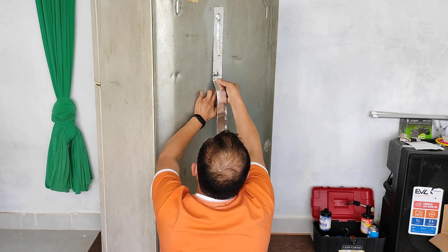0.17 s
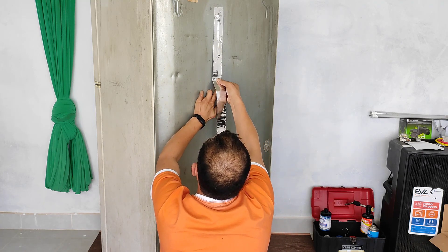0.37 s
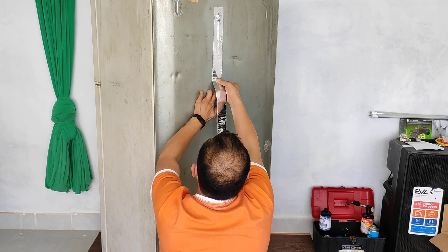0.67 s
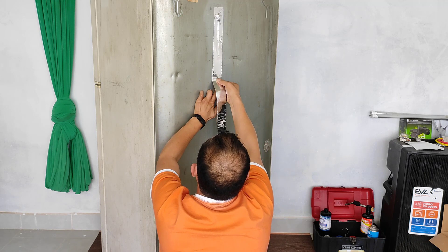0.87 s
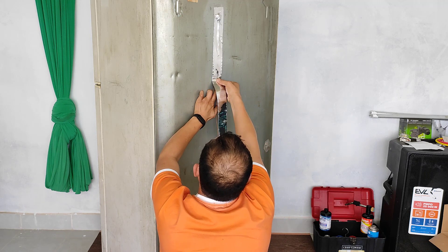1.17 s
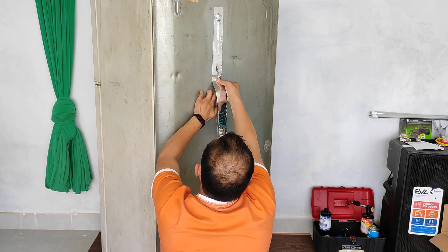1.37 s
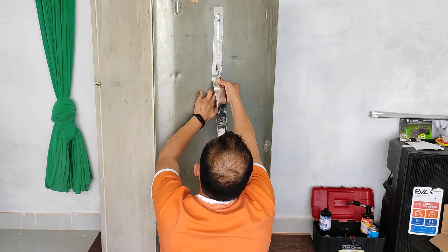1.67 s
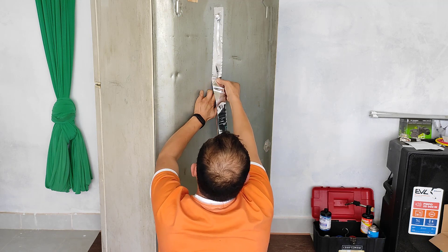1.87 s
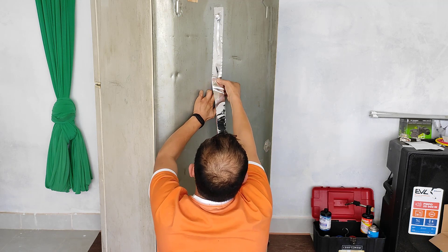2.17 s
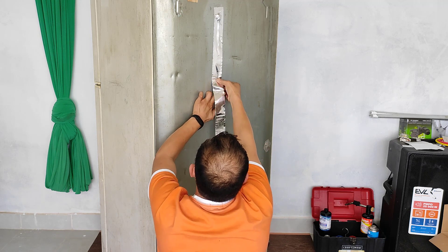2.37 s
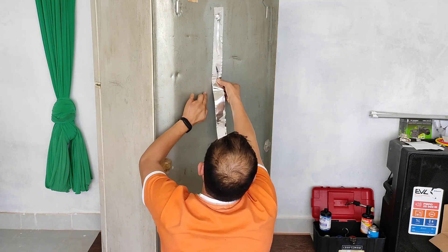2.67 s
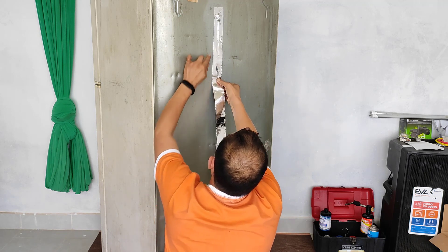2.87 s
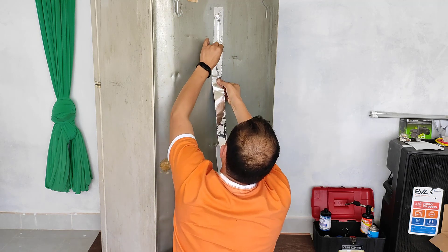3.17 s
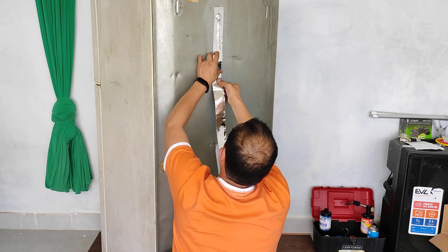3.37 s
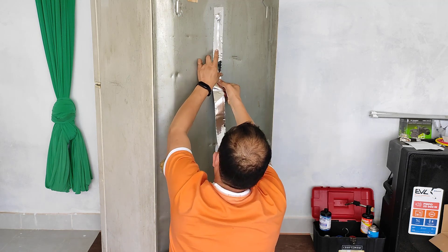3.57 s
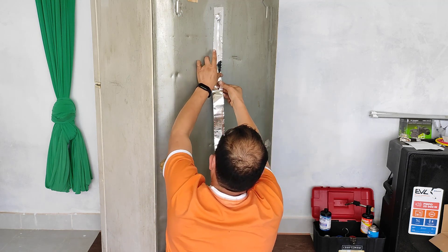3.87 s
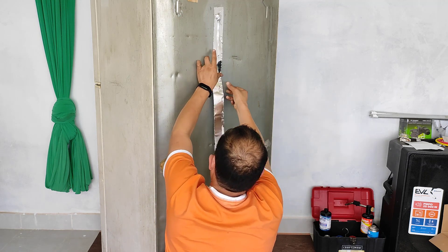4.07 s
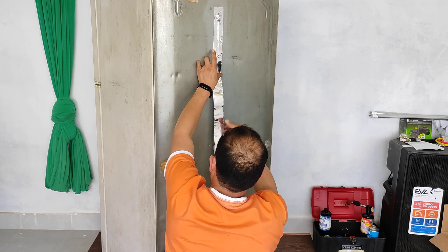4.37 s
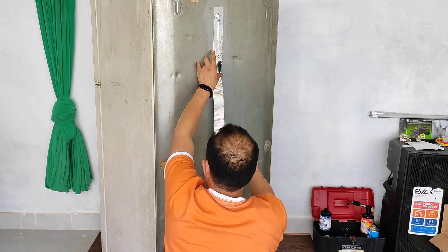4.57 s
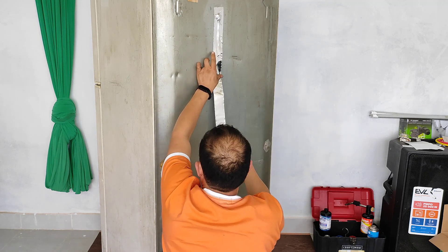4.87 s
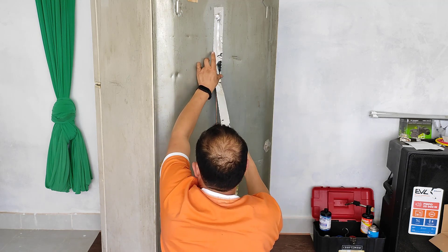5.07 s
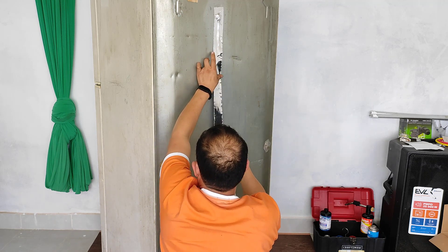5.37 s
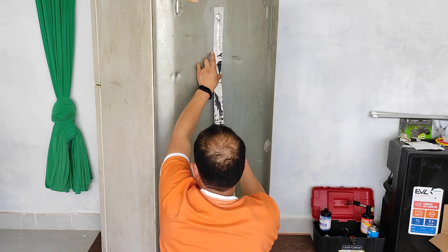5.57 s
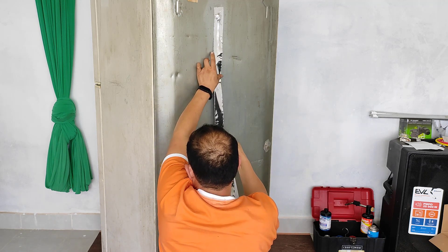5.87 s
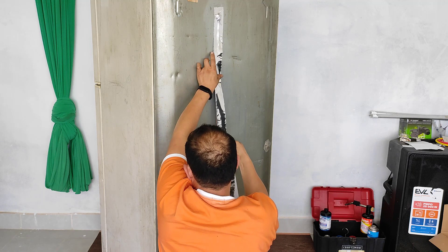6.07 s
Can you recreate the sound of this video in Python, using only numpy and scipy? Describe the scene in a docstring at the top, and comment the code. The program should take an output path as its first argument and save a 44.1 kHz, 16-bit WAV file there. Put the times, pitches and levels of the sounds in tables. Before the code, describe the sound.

Stiff foil tape snaps and crackles sharply under a hand against a sheet-metal panel, with a low thud, in a bare echoing room.

```python
"""Stiff foil tape snaps and creases under a hand on a tall sheet-metal panel, in a bare, hard room.
Snaps are wide clicks with a short ring at the crease's pitch, creasing is a spray of tiny filtered clicks,
and both pass through a synthetic room. Blows make the panel boom as a sum of decaying modes.
A low beating hum (two sines), faint gliding drones and slow air pressure lie under quiet room noise."""
import sys
import numpy as np
from scipy import signal
from scipy.fft import rfft, irfft
from scipy.io import wavfile

SR = 44100
rng = np.random.default_rng(int(sys.argv[2]) if len(sys.argv) > 2 else 0)


def dump(signal):
    """Clip the signal to [-1, 1] and save it as 16-bit WAV at the path in sys.argv[1]."""
    limited = np.clip(np.atleast_2d(signal).T, -1, 1)
    pcm = np.round(limited * 32767).astype(np.int16)
    wavfile.write(sys.argv[1], SR, pcm)


def decibels_to_gain(level_db):
    """Convert a level in decibels to a linear amplitude gain (20 dB per decade)."""
    exponent = np.asarray(level_db, float) / 20
    return 10 ** exponent


N = 274302  # samples

SHADE_FROM_S = 4.4  # from here the hand works lower down and the worker's back shades the snaps


def evened(x):
    """Scales to unit rms."""
    return x / np.sqrt(np.mean(x ** 2) + 1e-20)


def read(points, hz):
    """Interpolates (hz, value) points along log frequency."""
    point_hz, value = np.transpose(points)
    return np.interp(np.log(hz + 1), np.log(point_hz + 1), value)


def curve(rows):
    """Interpolates each column of (time_s, ...) rows over the scene."""
    time_s, *columns = np.transpose(rows)
    return [np.interp(np.arange(N) / SR, time_s, column) for column in columns]


def add(mix, start_s, sound):
    """Adds a sound in place, cut at the end of the mix."""
    part = mix[round(start_s * SR):][:len(sound)]
    part += sound[:len(part)]


def band(x, lo_hz, hi_hz, order=2):
    """Butterworth bandpass."""
    sos = signal.butter(order, [lo_hz, hi_hz], "bandpass", fs=SR, output="sos")
    return signal.sosfilt(sos, x)


def diffuse(size, shape, window=512):
    """Unit-rms noise at two microphones, alike by pitch; shape(hz, s) is its relative level in dB."""
    # left-right likeness: pitch_hz, likeness (0 to 1)
    likeness_points = [(40, 0.15), (70, 0.54), (130, 0.94), (290, 0.91), (640, 0.32), (1400, 0.082),
                       (3000, 0.051), (15000, 0.06)]
    frames = 4 * size // window + 5
    hz = np.fft.rfftfreq(window, 1 / SR)[:, None]
    time_s = np.arange(frames) * window / 4 / SR
    a, b, c, d = rng.standard_normal((frames, len(hz), 4)).T
    likeness = np.clip(read(likeness_points, hz), -1, 1)
    left = a + 1j * b
    right = likeness * left + np.sqrt(1 - likeness ** 2) * (c + 1j * d)
    spectra = np.array([left, right]) * decibels_to_gain(shape(hz, time_s))
    noise = signal.istft(spectra, nperseg=window, noverlap=3 * window // 4)[1]
    return evened(noise[:, :size])


def background():
    """Coloured room noise, plus slow pressure drift independent at each microphone."""
    # room noise spectrum: pitch_hz, relative_level_db
    air_colour = [(30, -10), (40, -12), (55, -12), (120, -14), (180, -13.5), (269, -9.5), (330, -21.5),
                  (514, -20), (785, -32), (850, -18), (950, -25.5), (2070, -42), (3200, -34), (8350, -40.5),
                  (10000, -43.5), (13600, -35.5), (15000, -58)]
    air = decibels_to_gain(-62.5) * diffuse(N, lambda hz, s: read(air_colour, hz), window=2048)
    drift = band(rng.standard_normal((2, N)), 1.14, 6.8, order=1)
    return air + decibels_to_gain(-50.5) * evened(drift)


def hum():
    """A steady low line and a second just below it, which work against each other once in every beat."""
    # time_s, upper_rms_db, beat_rate_hz, lower_rms_db
    hum_rows = [(0, -62, 4.7, -63), (1.0, -64, 4.1, -56.5), (1.6, -62.5, 3.06, -54.5),
                (2.0, -57.5, 2, -61.5), (2.6, -61, 1.14, -59), (2.87, -48.5, 1.12, -54),
                (3.02, -55, 1.27, -57), (3.25, -54, 2.2, -53), (3.67, -46.5, 1.13, -84.5),
                (4.05, -50, 0.85, -74), (4.25, -59.5, 0.97, -61.5), (4.6, -52.5, 1.38, -70),
                (4.85, -62.5, 1.6, -71), (5.5, -57.5, 0.7, -85), (5.65, -64, 1.3, -70), (5.8, -63, 1, -73),
                (6.22, -61, 1.1, -75)]
    upper_hz, first_cancel_s = 70.8, 0.22
    upper_db, beats_hz, lower_db = curve(hum_rows)
    turns = upper_hz * np.arange(N) / SR + rng.random()
    beats = np.cumsum(beats_hz) / SR
    beats -= beats[round(first_cancel_s * SR)]
    upper = decibels_to_gain(upper_db) * np.sin(2 * np.pi * turns)
    lower = decibels_to_gain(lower_db) * np.sin(2 * np.pi * (turns - beats))
    return np.sqrt(2) * (upper - lower)


def drones():
    """Faint low tones; each glides evenly under one arch of level."""
    # start_s, length_s, first_hz, last_hz, top_rms_db
    drone_rows = [(0.399, 2.9, 96.3, 118.1, -66.5), (2.5, 0.98, 100.6, 102.6, -62.5),
                  (3.449, 0.71, 100.1, 100.7, -58.5)]
    out = np.zeros(N)
    for start_s, length_s, first_hz, last_hz, top_db in drone_rows:
        progress = np.arange(0, length_s, 1 / SR) / length_s
        turns = np.cumsum(first_hz + (last_hz - first_hz) * progress) / SR + rng.random()
        arch = np.sin(np.pi * progress) ** 0.57
        add(out, start_s, np.sqrt(2) * decibels_to_gain(top_db) * arch * np.sin(2 * np.pi * turns))
    return out


def boom():
    """The sheet swings in modes near each blow's favoured pitch; they take a cycle or two to build."""
    # modes: pitch_hz, relative_level_db, t60_s
    panel_modes = [(36.85, 0.5, 1.24), (71, -12.5, 1.2), (124.7, -4.5, 0.92), (145.8, -11, 0.74),
                   (178.4, 0.5, 0.47), (212, -4, 0.33), (232.4, -9.5, 0.63), (254, -4, 0.39),
                   (302.3, -6, 0.2), (401.7, -5, 0.14), (470, -4, 0.25), (618, 13.5, 0.028)]
    # slow pushes reach low modes, quick knocks the higher ones: start_s, level_db, favoured_hz
    blow_rows = [(1.77, -50.5, 194), (1.809, -63, 227), (2.181, -55, 238), (3.502, -37.5, 59.4),
                 (3.512, -55, 323), (3.601, -34.5, 42.38), (4.12, -53.5, 273), (4.14, -56.5, 468),
                 (4.19, -56, 248)]
    t = np.arange(2 * SR) / SR
    out = np.zeros(N)
    for start_s, blow_db, favoured_hz in blow_rows:
        for hz, mode_db, t60_s in panel_modes:
            reach_db = -6 * np.log2(hz / favoured_hz) ** 2
            build_up = 1 - np.exp(-t * hz / 0.5)
            swing = np.sin(2 * np.pi * (hz * t + rng.random())) * build_up
            add(out, start_s, decibels_to_gain(blow_db + mode_db + reach_db - 60 * t / t60_s) * swing)
    return out


def creasing():
    """Many tiny unequal clicks of the settling foil, ringing at set pitches; strokes swell fast and die away."""
    # strokes of the hand: peak_s, level_db, fall_db_per_s
    stroke_rows = [(.04, -59.5, 53.5), (1.9, -69.5, 7.5), (4.2, -58.5, 74), (4.97, -70.5, 15),
                   (5.43, -73.5, 39), (5.75, -70, 30)]
    # click spectrum: pitch_hz, relative_level_db
    crease_colour = [(180, -61), (300, -2), (535, 2), (750, -4), (2100, -8), (3930, -12.5), (8920, -24),
                     (14000, -18)]
    clicks_per_s, rise_db_per_s, resting_db = 300, 90, -82
    ring_db, ring_cycles, pitch_count = 5, 3.4, 5
    t, f = np.arange(N) / SR, np.fft.rfftfreq(256, 1 / SR)
    power = decibels_to_gain(2 * resting_db)
    for peak_s, db, fall_db_per_s in stroke_rows:
        below_db = np.maximum(rise_db_per_s * (peak_s - t), fall_db_per_s * (t - peak_s))
        power = power + decibels_to_gain(2 * (db - below_db))
    struck = rng.random(N) < clicks_per_s / SR
    strength = decibels_to_gain(5.3 * np.minimum(rng.exponential(1, N), 3))
    clicks = struck * strength * rng.choice([-1, 1], N)
    kind = rng.integers(0, pitch_count, N)
    out = np.zeros(N)
    for k, hz in enumerate(np.geomspace(1300, 4120, pitch_count)):
        ring = decibels_to_gain(ring_db) / (1 + (2 * ring_cycles * (f / hz - 1)) ** 2)
        colour = decibels_to_gain(read(crease_colour, f)) * (1 + ring)
        grain = np.roll(irfft(colour), 128) * np.hanning(256)
        out += signal.oaconvolve(clicks * (kind == k), grain)[:N]
    return np.sqrt(power) * evened(out)


def snap(start_s, strength_db, hz, cycles, ring_db, tilt_db):
    """A crease flips over: a wide crack, bright or dull, with a short ring at the crease's own pitch."""
    # crack spectrum: pitch_hz, relative_level_db
    crack_colour = [(150, -119.5), (400, 0.5), (800, 6), (1500, 9.5), (2500, 5), (4000, 6), (5500, 4),
                    (7500, 2.5), (9500, -11), (13500, -3.5), (16000, 1)]
    spread_s, shade_hz, shade_db = 0.001208, 4300, -9.5
    t, f = np.arange(2048) / SR, abs(np.fft.fftfreq(2048, 1 / SR))
    crack_db = read(crack_colour, f) + tilt_db * np.log2(f / 3000 + 0.2)
    crack_db += (start_s > SHADE_FROM_S) * shade_db / (1 + (shade_hz / (f + 1)) ** 12)
    ring = decibels_to_gain(ring_db + read(crack_colour, hz)) / (1 + (2 * cycles * (f / hz - 1)) ** 2)
    log_gain = np.log(decibels_to_gain(2 * crack_db) + ring ** 2) / 2
    # spreads the click over about a millisecond, low pitches trailing the high ones
    delay_s = spread_s * np.exp(-f / 6000)
    lag = np.cumsum(delay_s * 2 * np.pi * SR / 2048)
    minimum_phase = signal.hilbert(log_gain).imag
    spectrum = np.exp(log_gain - 1j * (minimum_phase + lag))
    click = irfft(spectrum[:1025])
    # a faint decaying noise burst after the click roughens its spectrum slightly
    ripple = (t == 0) + 0.04 * rng.standard_normal(2048) * np.exp(-t / 0.001)
    sound = np.convolve(click[:512], ripple[:512])
    return decibels_to_gain(strength_db) * sound / np.linalg.norm(sound)


def room(x, direct_db):
    """Direct sound, a few near walls, then a random tail that builds up and dies band by band."""
    # decay: pitch_hz, t60_s
    decay_points = [(125, 0.93), (330, 0.92), (870, 0.73), (2300, 0.85), (4500, 0.88), (8000, 0.72),
                    (13000, 0.19)]
    # near walls: delay_s, level_db
    wall_echoes = [(.0024, -12), (.0047, -10), (.011, -11), (.0127, -9), (.0185, -10)]
    right_late = 1  # samples
    tail = diffuse(SR, lambda hz, s: -60 * s / read(decay_points, hz), window=256)
    tail *= 1 - np.exp(-np.arange(SR) / SR / 0.0023)
    tail *= decibels_to_gain(6.5) / np.linalg.norm(tail[0])
    tail[[0, 1], [0, right_late]] += decibels_to_gain(direct_db)
    for delay_s, db in wall_echoes:
        # each wall sends its echo from another side
        arrivals = round(delay_s * SR) + rng.integers(-20, 20, 2)
        tail[[0, 1], arrivals] += decibels_to_gain(db) * rng.choice([-1, 1])
    return signal.fftconvolve(x[None], tail, axes=1)[:, :N]


def face_apart(foil):
    """The two microphones face different ways, so their balance varies with pitch."""
    # pitch_hz, left_minus_right_db
    lean_points = [(200, 0), (700, -0.5), (1300, -0.9), (2400, -1.2), (4400, -3), (5800, -5.5), (7600, 2.5),
                   (9500, 4), (12000, -7.5), (15000, 7)]
    lean = decibels_to_gain(read(lean_points, np.fft.rfftfreq(N, 1 / SR)) / 2)
    return irfft(rfft(foil) * [lean, 1 / lean], N)


def scene():
    """Sends snaps, creasing and upper panel modes through the room, then adds the other layers."""
    # start_s, strength_db, crease_hz, ring_cycles, ring_over_untilted_crack_db, tilt_db_per_octave (approx.)
    snap_rows = [(0.032, -15, 2480, 1.6, 8.5, 1.9), (0.062, -22, 1700, 2.4, 3, 0.5),
                 (0.169, -19, 3410, 8.6, 15, 0.5), (0.182, -30, 3400, 8.5, 10, -4),
                 (0.691, -30, 2880, 1.5, 17.5, 0), (1.404, -34.5, 4300, 2, 11.5, 6),
                 (1.527, -23.5, 2740, 1.9, 12.5, -1.3), (1.77, -18, 3580, 0.92, 12, -1.1),
                 (1.810, -14, 2580, 7.1, 11, 2), (1.939, -27, 2260, 3.6, 12, 1.5),
                 (1.961, -21.5, 2200, 4, 11.5, -4), (2.182, -15, 2260, 3.8, 6.5, 2.8),
                 (2.499, -36.5, 2865, 2.2, 17, -9.5), (3.487, -43, 3400, 1.87, 19, -6),
                 (3.498, -21, 3430, 1.8, 10.5, -0.5), (3.762, -23.5, 2710, 3.1, 15.5, 2),
                 (4.117, -15, 3590, 3.5, 9.5, 1.3), (4.128, -12, 2510, 3.2, 11, 3),
                 (4.194, -17.5, 2290, 2.7, 14, 3.4), (4.788, -39, 1392, 2.3, 3, 2.5),
                 (4.937, -38, 1980, 3, 4, 2), (5.063, -31.5, 2380, 2.3, 7, -1.5),
                 (5.346, -32, 1578, 4, 5, -5.5), (5.406, -31.5, 2020, 5.7, 1, -5.5),
                 (5.599, -37, 1564, 5.7, 3, -1), (5.667, -29.5, 2150, 4, 6, 0),
                 (5.794, -31.5, 2000, 3.5, 7, 0), (5.824, -31.5, 1340, 4.1, 4, -11),
                 (6.001, -35.5, 1590, 4, 8, -1), (6.037, -35.5, 3690, 3.5, 6, -6)]
    # snaps take turns among three random room tails; late snaps share a fourth with weaker direct sound
    sends = np.zeros((4, N))
    for k, (start_s, *row) in enumerate(snap_rows):
        send = 3 if start_s > SHADE_FROM_S else k % 3
        add(sends[send], start_s, snap(start_s, *row))
    sends[0] += creasing()
    panel = boom()
    sends[1] += band(panel, 226, 990)  # the upper modes scatter in the room
    # the back also blocks part of the late snaps' direct sound
    foil = sum(room(x, -4 if k == 3 else 0) for k, x in enumerate(sends))
    return face_apart(foil) + panel + hum() + drones() + background()


def top_cut(x):
    """Nothing passes above the cut-off."""
    return signal.sosfilt(signal.butter(12, 15600, fs=SR, output="sos"), x)


def record(dry):
    """A steep linear-phase lowpass ends the band below 15 kHz."""
    edge = signal.firwin(255, 14500, window=("kaiser", 8), fs=SR)
    mix = signal.oaconvolve(dry, edge[None], "same")
    return top_cut(mix)


dry = scene()
out = record(dry)
dump(out)
```